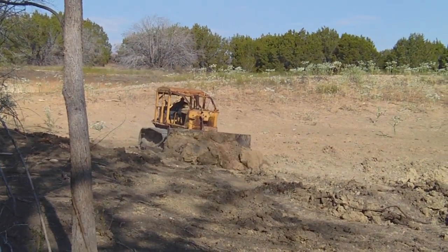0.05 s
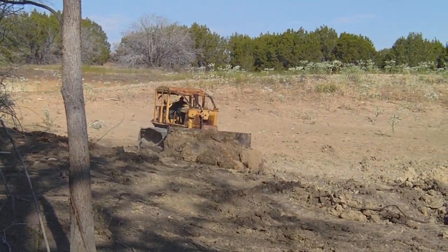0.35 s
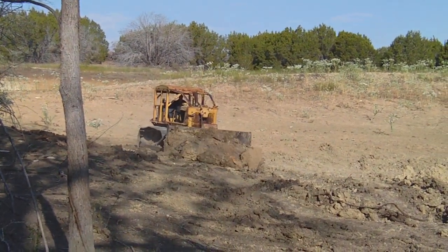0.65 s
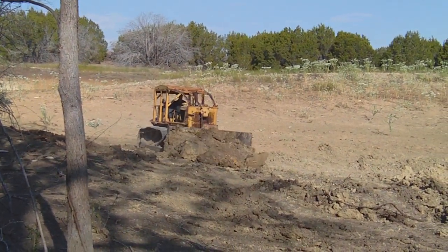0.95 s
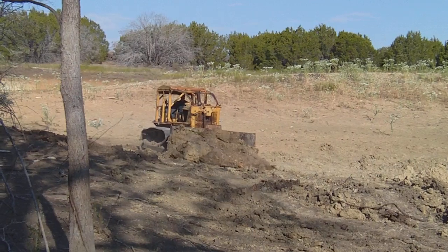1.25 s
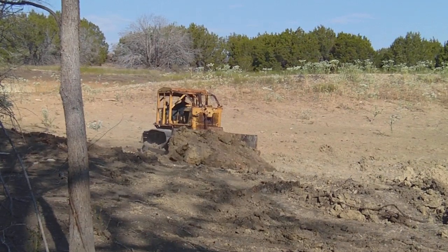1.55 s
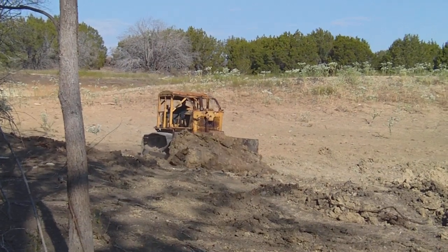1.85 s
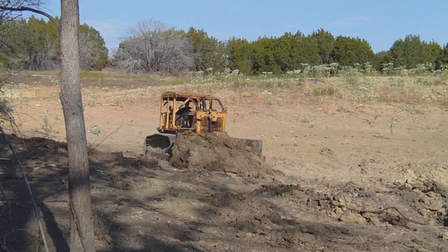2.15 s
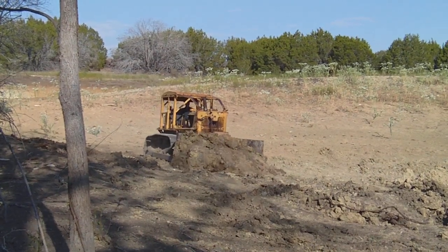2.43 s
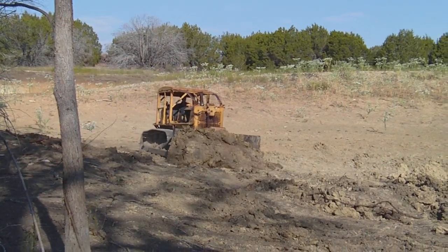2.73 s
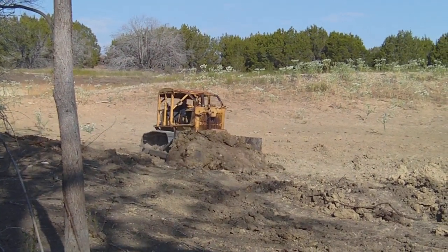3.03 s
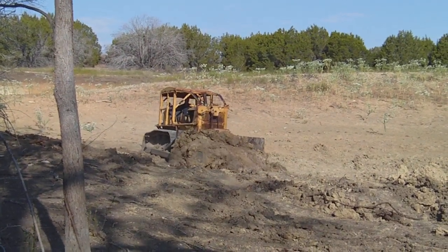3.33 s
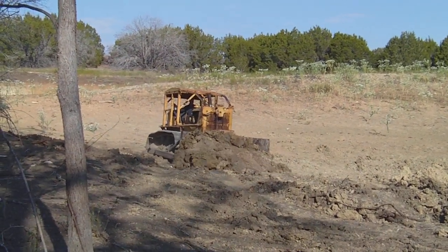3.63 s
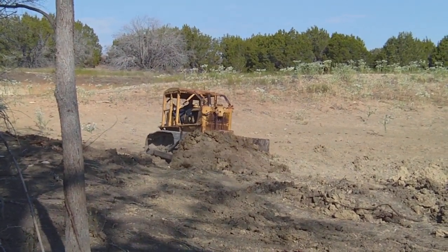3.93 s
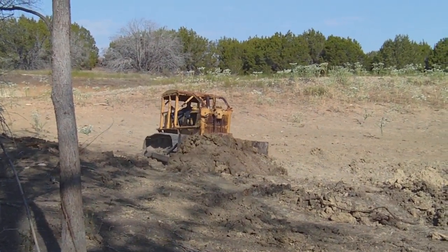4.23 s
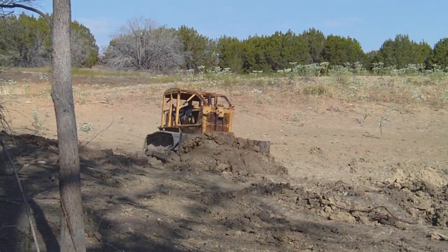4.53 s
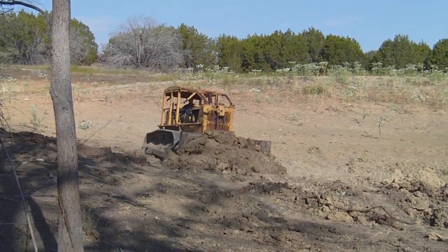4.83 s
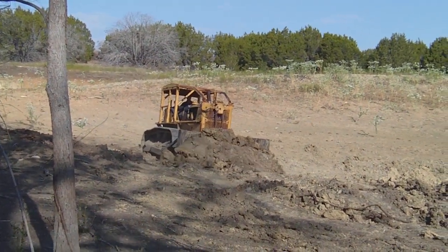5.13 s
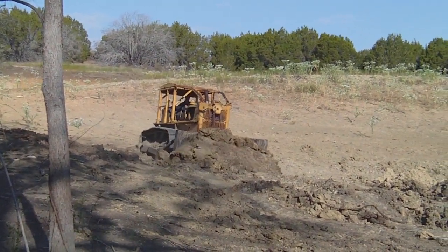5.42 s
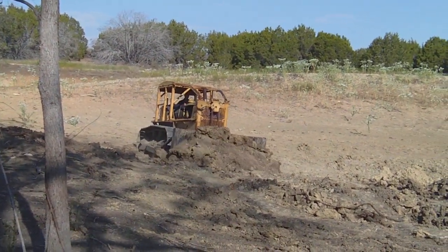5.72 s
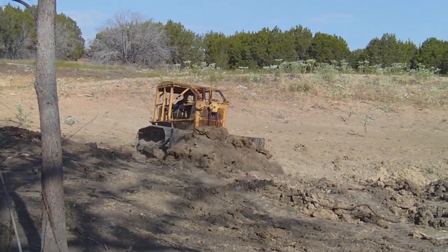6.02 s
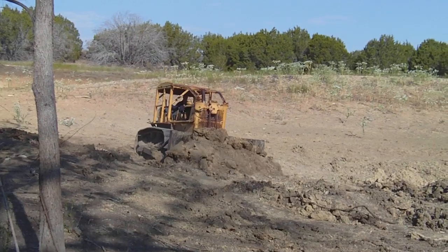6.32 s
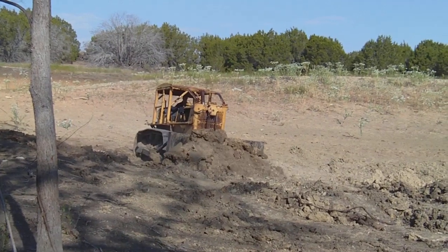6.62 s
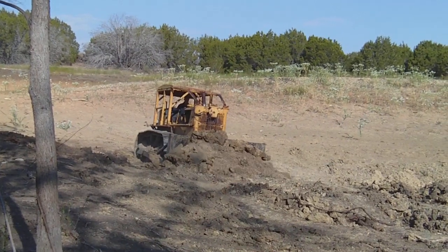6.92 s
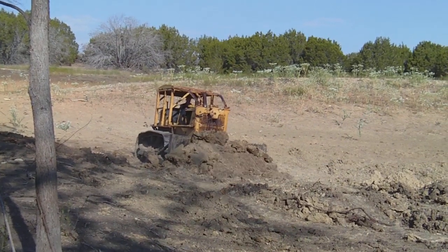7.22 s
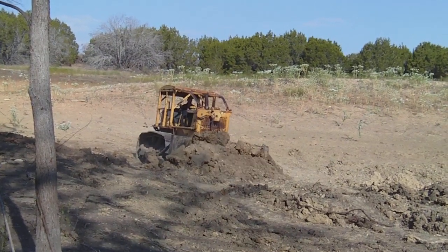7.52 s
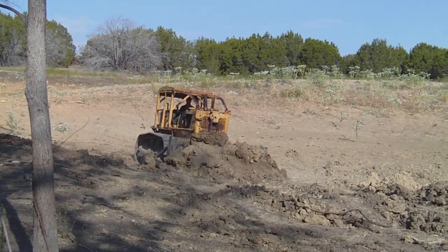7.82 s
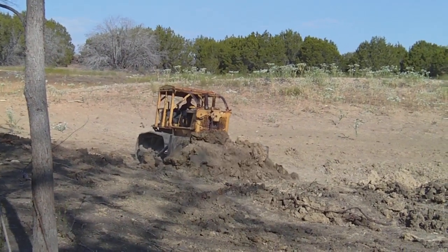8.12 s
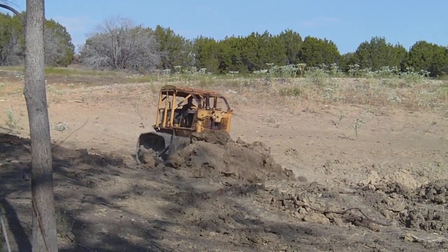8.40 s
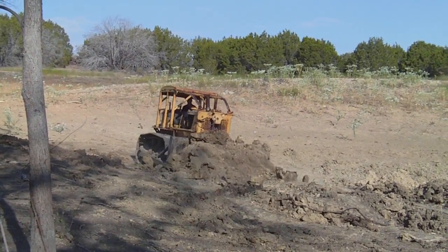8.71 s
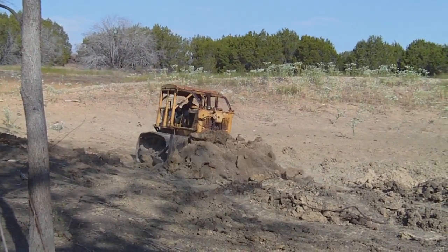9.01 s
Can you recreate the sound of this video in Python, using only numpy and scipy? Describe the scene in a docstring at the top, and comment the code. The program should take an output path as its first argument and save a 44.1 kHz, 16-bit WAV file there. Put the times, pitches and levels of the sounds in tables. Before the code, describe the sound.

A diesel bulldozer chugs under load with a whistling turbo and squeaking tracks, while wind gusts buffet the microphone.

```python
"""An old four-cylinder turbo-diesel bulldozer creeps nearer across an open field, pushing earth.
Its firings are a periodic excitation: each rings the block and covers, blows the exhaust pipe into
resonance and kicks the whistling turbocharger. Timing gears whine at their mesh frequency, and dry
track pins chirp by friction. Gusts buffet a mono microphone and briefly overload it."""
import sys
import numpy as np
from scipy import signal
from scipy.fft import rfft, irfft, next_fast_len
from scipy.io import wavfile
from scipy.ndimage import uniform_filter1d

SR = 44100
rng = np.random.default_rng(int(sys.argv[2]) if len(sys.argv) > 2 else 0)


def master(y):
    """Save y as 16-bit WAV."""
    cut = np.clip(np.atleast_2d(y).T, -1, 1)
    pcm = np.round(cut * 32767)  # scale
    wavfile.write(sys.argv[1], SR, pcm.astype(np.int16))


N = 399546
TIME = np.arange(N) / SR

# crankshaft speed: t/s, speed/rpm
CRANK_SPEED = [(0.0, 960.5), (0.4, 971.8), (0.8, 987.1), (1.25, 953.9), (2.55, 941.3), (3.35, 958.8),
               (4.25, 930.2), (4.45, 943.5), (4.65, 946.0), (5.2, 979.8), (5.65, 1005.6), (6.2, 990.8),
               (6.85, 989.9), (7.4, 950.0), (7.95, 926.9), (8.65, 888.5), (9.06, 902.0)]
# cylinders in firing order: knock/dB, hiss/dB, turbo surge at low boost/dB, surge at high boost/dB,
# pitch shift of the surge at low boost/Hz, choke of the blade tone/dB
CYLINDER_BALANCE = [(4.5, 2, 2, -3, -90, -3), (7, 7.5, -6.5, 1, 11, -12), (4, 3.5, 2.7, -2.5, -40, -2),
                    (3.5, -2, -10.5, -2, 15, -9.5)]
# engine envelopes: t/s, relative roar level/dB, clatter level/dB
ENGINE_LEVELS = [(0, -24, -26), (.5, -25.5, -25), (.92, -24, -25), (1.5, -25.5, -24.5), (2.1, -24.5, -24),
                 (3.1, -24, -22), (3.7, -24, -23), (4.7, -22, -20.5), (5.25, -22.5, -21.5),
                 (6.2, -23, -22.5), (7.1, -23.5, -23), (7.47, -23, -19.5), (8, -22, -21),
                 (9.06, -23, -21.5)]
# spectrum of the block's roar: f/Hz, relative level/dB
ROAR_SPECTRUM = [(60, -1.5), (140, -10.5), (260, -4.5), (420, -9), (540, -1), (680, 1), (830, -1.5),
                 (1100, -2), (1600, -2.5), (2100, -8), (3200, -32.5)]
# spectrum of the diesel knock: f/Hz, relative level/dB
CLATTER_SPECTRUM = [(1100, -26), (1800, -8), (2200, -2.5), (2700, -2.5), (3500, -4), (5000, -7),
                    (7000, -38)]
# resonances of the engine covers: f/Hz, width/Hz, lift/dB
COVER_MODES = [(1013, 83, 4.5), (1195, 150, 4.5), (1717, 47, 6), (2017, 180, 3.5), (2234, 290, 3),
               (2645, 240, 5), (2920, 160, 2.5)]
# engine tones: order/(cycles per crank turn), mean level/dB
ENGINE_ORDERS = [(4, -39), (6, -42.5), (7.5, -41.7), (8, -39), (10, -46), (22, -47), (35.5, -43.5)]
# resonance of the exhaust pipe: f/Hz, relative level/dB
PIPE_SPECTRUM = [(450, -35.5), (600, -9.5), (665, 0.5), (730, -6), (900, -36.5)]
# spectrum of the rushing exhaust gas: f/Hz, relative level/dB
HISS_SPECTRUM = [(1500, -29.5), (3000, -2), (4000, 0), (4700, 0), (5500, 2), (6200, -0.5), (6800, 2),
                 (7300, -14)]
# blade tone of the turbocharger: t/s, f/Hz
BLADE_PITCH = [(0, 5406), (0.7, 5157), (1.4, 5000), (1.9, 4930), (2.9, 4933), (4.0, 4900), (4.35, 4945),
               (4.9, 5500), (5.5, 5780), (6.4, 5655), (7.5, 5725), (8.2, 5887), (9.06, 6212)]
# fading and swelling of the treble over open ground: t/s, relative level/dB
TREBLE_SWELL = [(0, -22.5), (0.55, -24.5), (1.15, -23.5), (1.55, -26), (1.9, -19.5), (2.4, -21),
                (3.25, -19.5), (3.55, -23.5), (4.2, -22), (5.1, -17.5), (5.35, -19), (5.95, -16),
                (6.15, -23), (6.85, -16), (7.2, -18), (7.55, -13.5), (7.9, -18.5), (8.53, -20.5),
                (8.68, -14.5), (9.06, -15)]
# gear whine, varying with the load on the teeth: t/s, level/dB
GEAR_LEVELS = [(0, -28.5), (.8, -30.5), (2.3, -32.5), (3.05, -27.5), (4.2, -34.5), (4.8, -34), (5.95, -26),
               (6.4, -30), (6.75, -28), (7.7, -29), (9.06, -29.5)]
# track squeaks: peak t/s, f/Hz, nominal level/dB, half duration/s
TRACK_SQUEAKS = [(0.73, 4595, -15.3, 0.06), (1.883, 4670, -24, .09), (2.25, 4595, -18.5, 0.052),
                 (3.09, 4430, -23, 0.072), (5.697, 4580, -21.5, 0.08), (6.56, 4650, -27, .04),
                 (7.378, 4650, -25, 0.025), (7.505, 4470, -25.5, 0.08), (8.278, 4730, -22, 0.04),
                 (8.40, 4620, -23.5, .018), (8.475, 4660, -26, .04), (8.55, 4700, -24.5, .025),
                 (8.673, 4012, -17.5, 0.06)]
# gusts: peak t/s, 1/e half width/s, nominal level/dB
WIND_GUSTS = [(0.02, .07, -19), (.34, 0.032, -18.5), (1.98, 0.03, -21), (2.27, 0.042, -18.5),
              (2.68, 0.26, -18.5), (3.01, 0.11, -17.5), (3.38, 0.22, -12), (3.618, 0.019, -1.5),
              (3.69, 0.15, -10), (3.96, 0.065, -11.5), (4.075, 0.05, -4.5), (4.31, 0.07, -10.5),
              (4.66, 0.27, -23), (5.38, 0.19, -19), (5.81, 0.15, -20), (6.06, 0.086, -13),
              (6.9, 0.17, -23.5), (7.25, 0.093, -14.5), (8.1, 0.26, -20.5), (8.59, .035, -18)]
# spectrum of the wind's rumble: f/Hz, relative level/dB
WIND_SPECTRUM = [(5, -28), (25, 2.5), (60, 0), (110, -3), (200, -11.5), (350, -23.5), (700, -28),
                 (2000, -61.5)]
# sharp eddies striking the microphone: peak t/s, level/dB
EDDY_STRIKES = [(.206, -14.5), (2.67, -11.5), (2.779, -18), (2.981, -5), (3.03, -15), (3.068, -14),
                (3.292, -13), (3.35, -14), (3.405, -16), (3.452, -12), (3.491, -10), (3.72, -7),
                (3.808, -13), (4.116, -9), (4.159, -6.5), (4.272, -16), (4.298, -12), (4.329, -8.5),
                (5.775, -20), (6.02, -13), (6.13, -18), (6.204, -9), (7.29, -11.5)]


def block_roar(pulses, ring_s, knock_db, steady, grit_db):
    """Impulse response: each firing rings the heavy block, over pulsing noise, in a nearly even roar."""
    knock = unit(bandpass(ringing(pulses, ring_s), 150, 600))
    rumble = noise() * (steady + puffs(pulses, rise_s=0.0023, decay_s=0.021)) * undb(grit_db * walk(700))
    return colour(unit(rumble) + undb(knock_db) * knock, ROAR_SPECTRUM, COVER_MODES)


def cover_clatter(pulses, ring_s, knock_db, steady, grit_db):
    """Impact excitation: diesel knock rings the light covers, and their rattle surges at each firing."""
    knock = unit(ringing(pulses, ring_s))
    rattle = noise() * (steady + puffs(pulses, rise_s=0.001, decay_s=0.014)) * undb(grit_db * walk(700))
    return colour(unit(rattle) + undb(knock_db) * knock, CLATTER_SPECTRUM, COVER_MODES)


def firings(turns, cylinder_db, scatter_db, jitter_s):
    """Four-stroke cycle: two impulses per crank turn, varying by cylinder and from cycle to cycle."""
    onsets = np.flatnonzero(np.diff(np.floor(2 * turns)))
    cylinder = (2 * turns[onsets + 1]).astype(int) % len(cylinder_db)
    size, lateness = rng.standard_normal((len(onsets), 2)).T
    onsets = np.clip(onsets + (lateness * jitter_s * SR).astype(int), 0, N - 1)
    pulses = np.zeros(N)
    pulses[onsets] = undb(cylinder_db[cylinder] + scatter_db * size)
    return pulses


def ringing(pulses, decay_s):
    """Damped vibration: every impulse excites the same dense, exponentially decaying ring."""
    t = TIME[:SR // 10]
    return signal.fftconvolve(pulses, rng.standard_normal(len(t)) * np.exp(-t / decay_s))[:N]


def puffs(pulses, rise_s, decay_s):
    """Relaxation: gas pressure jumps after each firing and drains exponentially; rms 1."""
    t = TIME[:SR // 10]
    puff = (1 - np.exp(-(t / rise_s) ** 2)) * np.exp(-t / decay_s)
    return unit(signal.fftconvolve(pulses, puff)[:N])


def engine_hum(turns, waver_db):
    """Periodic forcing: exhaust notes and engine tones lie at fixed multiples of the crank rate."""
    return sum(np.sqrt(2) * undb(db + waver_db * walk(9))
               * np.sin(2 * np.pi * order * turns + .5 * walk(12)) for order, db in ENGINE_ORDERS)


def pipe_drone(pulses, boost, base_db, boost_db):
    """Air-column resonance: the puffs blow a hollow note in the exhaust pipe, louder with boost."""
    flow = noise() * (2 + puffs(pulses, rise_s=0.003, decay_s=0.02))
    return undb(base_db + boost_db * np.sqrt(boost)) * colour(flow, PIPE_SPECTRUM)


def exhaust_hiss(pulses, steady, grit_db):
    """Flow noise: gas rushing from the stack is modulated in amplitude by the puffs."""
    flow = steady + puffs(pulses, rise_s=0.0058, decay_s=0.016)
    return colour(noise() * flow * undb(grit_db * walk(500)), HISS_SPECTRUM)


def turbo_load(blade_hz):
    """Turbocharging: boost is rotor speed scaled from 0 to 1; strain is its smoothed rise per second."""
    boost = (blade_hz - np.min(blade_hz)) / np.ptp(blade_hz)
    return boost, uniform_filter1d(np.gradient(boost, TIME), size=16000)


def turbo_tone(turns, blade_hz, boost, strain, waver_db, rough_db):
    """Blade passage: the rotor sounds a fluttering tone, which each exhaust puff briefly chokes."""
    lead, width = .07, .14  # timing of the choke, in firing intervals
    depth_db = np.transpose(CYLINDER_BALANCE)[5]
    firing, offset = np.divmod(2 * turns + lead + .5, 1)
    choke_db = depth_db[firing.astype(int) % len(depth_db)] * np.exp(-((offset - .5) / width) ** 2)
    drift_hz = 7 * walk(25) + (13 * boost + 60 * strain) * walk(130)
    tone = np.sin(phase_of(blade_hz + drift_hz))
    return unit(tone * undb(waver_db * np.tanh(walk(28)) + rough_db * walk(200) + choke_db))


def turbo_surges(turns, blade_hz, boost, strain, rough_db, skirt_db, air_db):
    """Frequency modulation: each exhaust puff carries a rough, falling chirp of the blade tone."""
    low_db, high_db, shift_hz = np.transpose(CYLINDER_BALANCE)[2:5]
    # at high boost the puffs last longer and other cylinders lead
    blend = np.minimum(2 * boost, 1)
    short = puffs(firings(turns, low_db, scatter_db=1.0, jitter_s=0.0003), rise_s=0.011, decay_s=0.004)
    long = puffs(firings(turns, high_db, scatter_db=0.8, jitter_s=0.0007), rise_s=0.0085, decay_s=0.0088)
    pressure = (1 - blend) * short + blend * long
    # the pitch is pushed up while the pressure rises and dips as it drains
    slope = unit(np.gradient(uniform_filter1d(pressure, size=180)))
    cylinder_hz = shift_hz[(2 * turns).astype(int) % len(shift_hz)] * (1 - blend)
    rasp = 1 + 0.6 * boost + strain
    phase = phase_of(blade_hz + cylinder_hz + rasp * (24 * slope + 22 * walk(220)))
    chirps = np.sin(phase) * pressure * undb(rough_db * walk(180))
    # turbulence smears each chirp into a narrow skirt of noise and a wider breath of air
    skirt = (np.sin(phase) * walk(380) + np.cos(phase) * walk(380)) * (1 + long) * rasp ** 2
    air = (np.sin(phase) * walk(1500) + np.cos(phase) * walk(1500)) * (1 + long)
    return unit(chirps) + undb(skirt_db) * unit(skirt) + undb(air_db) * unit(air)


def gear_whine(turns, teeth, backlash_rad, waver_db):
    """Tooth meshing: a thin tone at tooth count times crank rate, its phase roughened by backlash."""
    level_db, = curves(GEAR_LEVELS)
    mesh = 2 * np.pi * teeth * turns
    return np.sqrt(2) * undb(level_db + waver_db * walk(14)) * np.sin(mesh + backlash_rad * walk(30))


def track_squeaks(rough_db, rub_hz, rub_db, nearing_db_per_s):
    """Dry friction: track pins rub, louder as they near, and sing as a link bends round the sprocket."""
    wobble_hz = 20 * walk(160)
    grip = undb(rough_db * walk(100))
    rubbing = np.sin(phase_of(rub_hz + 45 * walk(12) + 6 * wobble_hz))
    out = undb(rub_db + nearing_db_per_s * TIME) * np.minimum(np.abs(walk(36)), 1.3) * rubbing
    for peak_s, hz, db, half_s in TRACK_SQUEAKS:
        span = np.abs(TIME - peak_s) < half_s
        envelope = np.cos(np.pi / 2 * (TIME[span] - peak_s) / half_s) ** 4
        out[span] += undb(db) * envelope * np.sqrt(2) * np.sin(phase_of(hz + wobble_hz[span]))
    return out * grip


def wind(breeze_db, wander_db, eddy_db, bright_db, lumpy_db):
    """Turbulent pressure: eddies thump the microphone; stronger gusts carry smaller, brighter ones."""
    strength = np.hypot(swells(WIND_GUSTS), undb(breeze_db + wander_db * walk(6.5)))
    rumble = levelled(colour(noise(), WIND_SPECTRUM) * undb(lumpy_db * walk(40)), samples=6000)
    flutter = unit(bandpass(noise(), 120, 380)) * undb(eddy_db * walk(45))
    return strength * (rumble + undb(bright_db) * np.sqrt(strength) * flutter)


def buffets(half_s):
    """Pressure transients: sharp eddies strike the microphone as short, brighter thumps."""
    envelope = swells([(peak_s, half_s, db) for peak_s, db in EDDY_STRIKES])
    eddies = colour(noise(), [(40, -16), (180, 3), (330, -8), (600, -24), (1500, -45)])  # f/Hz, level/dB
    return envelope * levelled(eddies, samples=1500)


def swells(table):
    """Incoherent addition: Gaussian swells (peak t/s, half width/s, level/dB) sum in power."""
    return np.sqrt(sum((undb(db) * np.exp(-((TIME - s) / half) ** 2)) ** 2 for s, half, db in table))


def colour(x, spectrum, modes=()):
    """Source-filter principle: shape x by a spectral envelope with resonance peaks on it; rms 1."""
    size = next_fast_len(N, True)
    f = np.maximum(np.fft.rfftfreq(size, 1 / SR), 1)
    hz, db = np.transpose(spectrum)
    gain_db = np.interp(np.log(f), np.log(hz), db)
    for centre, width, lift in modes:
        gain_db += lift / (1 + (2 * (f - centre) / width) ** 2)
    return unit(irfft(rfft(x, size) * undb(gain_db))[:N])


def bandpass(x, low_hz, high_hz):
    """Band limiting between two edge frequencies."""
    return signal.sosfilt(signal.butter(2, [low_hz, high_hz], "band", fs=SR, output="sos"), x)


def phase_of(hz):
    """Phase/rad as the time integral of frequency."""
    return 2 * np.pi * np.cumsum(hz) / SR


def curves(table):
    """Linear interpolation of each column of a timed table, sample by sample."""
    times, *columns = np.transpose(table)
    return [np.interp(TIME, times, column) for column in columns]


def noise():
    """White noise."""
    return rng.standard_normal(N)


def walk(rate):
    """Random modulation that glides to a new value rate times a second; rms 1."""
    return unit(np.interp(TIME * rate, np.arange(20000), rng.standard_normal(20000)))


def levelled(x, samples):
    """Normalisation by the running rms."""
    return x / np.sqrt(uniform_filter1d(x ** 2, size=samples))


def unit(x):
    """Normalisation to rms 1."""
    return x / np.sqrt(np.mean(x ** 2))


def undb(db):
    """Amplitude ratio from level/dB."""
    return 10 ** (np.asarray(db) / 20)


def scene():
    """Superposition in a free field: machine and wind add, with no walls to echo them."""
    rpm, = curves(CRANK_SPEED)
    turns = np.cumsum(rpm / 60) / SR + .752
    blade_hz, = curves(BLADE_PITCH)
    boost, strain = turbo_load(blade_hz)
    rising = np.maximum(strain, 0)
    roar_db, clatter_db = curves(ENGINE_LEVELS)
    treble_db, = curves(TREBLE_SWELL)
    effort_db = roar_db - np.mean(roar_db)
    swell_db = treble_db - np.mean(treble_db)
    knock_db, hiss_db = np.transpose(CYLINDER_BALANCE)[:2]
    pulses = firings(turns, knock_db, scatter_db=1.1, jitter_s=.0005)
    exhausts = firings(turns, hiss_db, scatter_db=1.0, jitter_s=.0005)

    block = undb(roar_db + 2.5) * block_roar(pulses, ring_s=.028, knock_db=-15.5, steady=2.9, grit_db=.9)
    covers = undb(clatter_db) * cover_clatter(pulses, ring_s=.014, knock_db=-5.5, steady=1.8, grit_db=1)
    hiss = exhaust_hiss(exhausts, steady=1.9, grit_db=2.0)
    hiss *= undb(-23.5 + effort_db + 1.5 * strain + 0.27 * swell_db)
    tone = turbo_tone(turns, blade_hz, boost, rising, waver_db=3.2, rough_db=1.2)
    tone *= undb(-25.7 + 0.95 * swell_db - 4 * rising)
    surges = turbo_surges(turns, blade_hz, boost, rising, rough_db=1.2, skirt_db=-4.5, air_db=-7.5)
    surges *= undb(-24 + 0.87 * swell_db)
    squeaks = track_squeaks(rough_db=2.5, rub_hz=4660, rub_db=-38, nearing_db_per_s=1.0)
    whine = gear_whine(turns, teeth=44, backlash_rad=0.35, waver_db=1.5)
    # gusty air between machine and microphone makes the treble flicker a little
    treble = undb(.5 * walk(20)) * (hiss + tone + surges + squeaks)
    hum = undb(effort_db) * engine_hum(turns, waver_db=3.0)
    drone = pipe_drone(pulses, boost, base_db=-39.5, boost_db=9)
    gusts = wind(breeze_db=-35, wander_db=3.5, eddy_db=6.5, bright_db=-9.5, lumpy_db=5.0)
    mono = block + covers + hum + whine + drone + treble + gusts + buffets(half_s=0.0076)
    return np.array([mono, mono])


def record(dry):
    """Saturation: wind peaks flatten the bass and choke the treble; a low-pass then cuts the top."""
    bass = signal.sosfiltfilt(signal.butter(2, 1500, fs=SR, output="sos"), dry)
    overload_gain = (1 + (bass / .6) ** 6) ** (-1 / 6)
    squashed = bass * overload_gain + (dry - bass) * overload_gain ** 1.7
    rounded = squashed / (1 + (squashed / .69) ** 8) ** (1 / 8)
    return signal.sosfilt(signal.ellip(10, .2, 90, 7250, fs=SR, output="sos"), rounded)


dry = scene()
out = record(dry)
master(out)
```